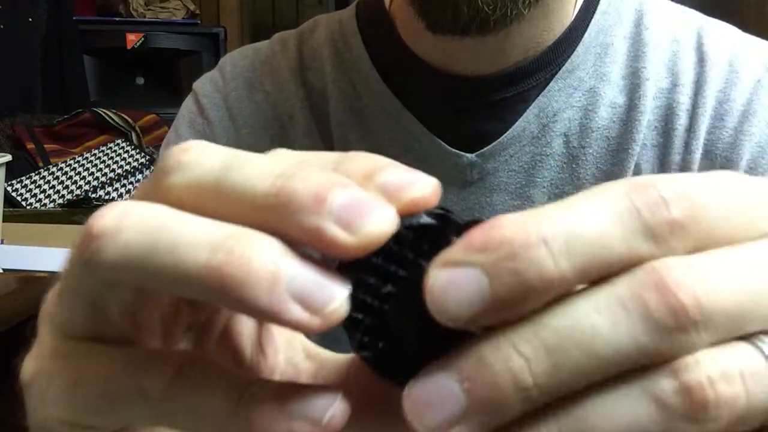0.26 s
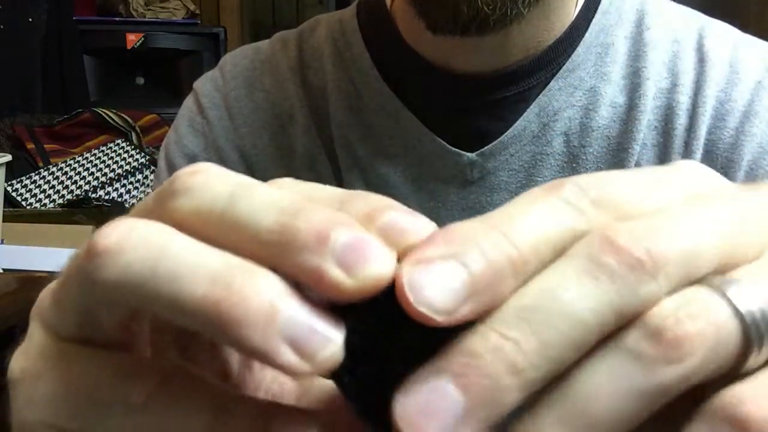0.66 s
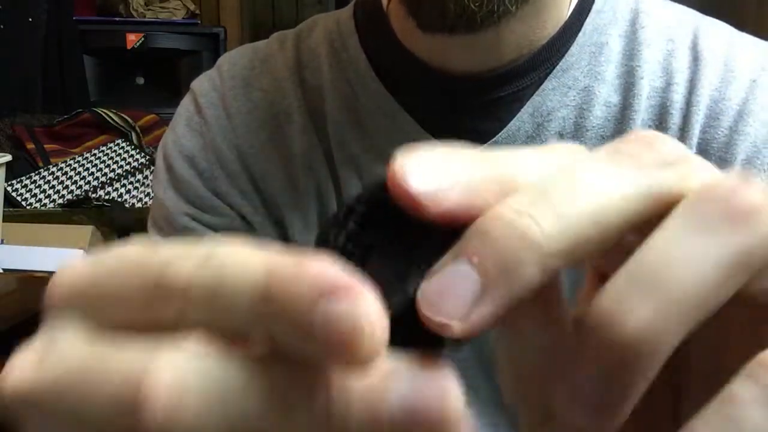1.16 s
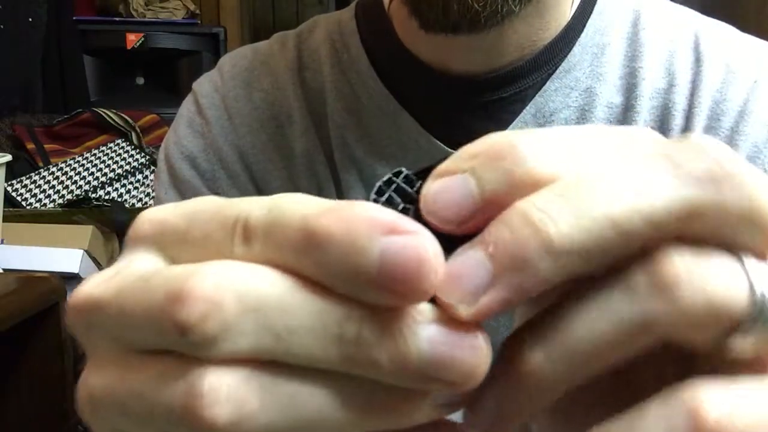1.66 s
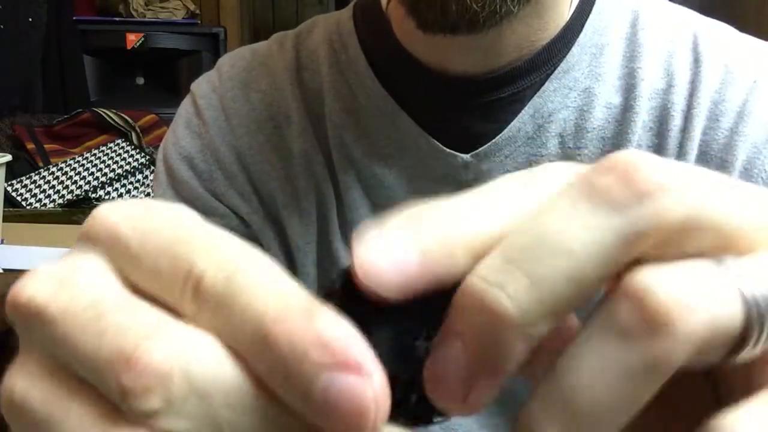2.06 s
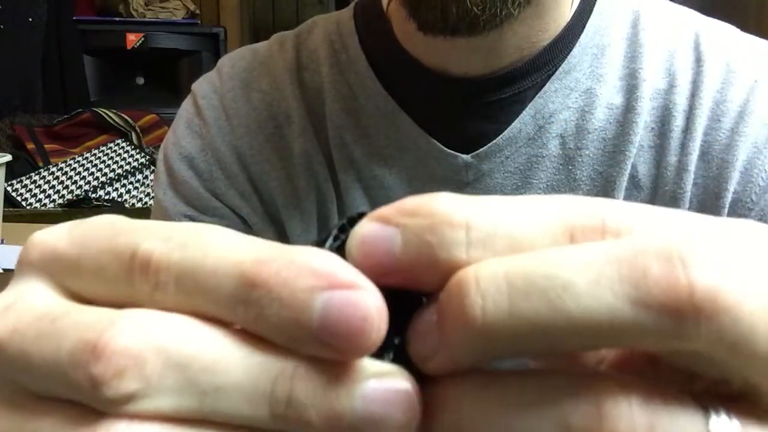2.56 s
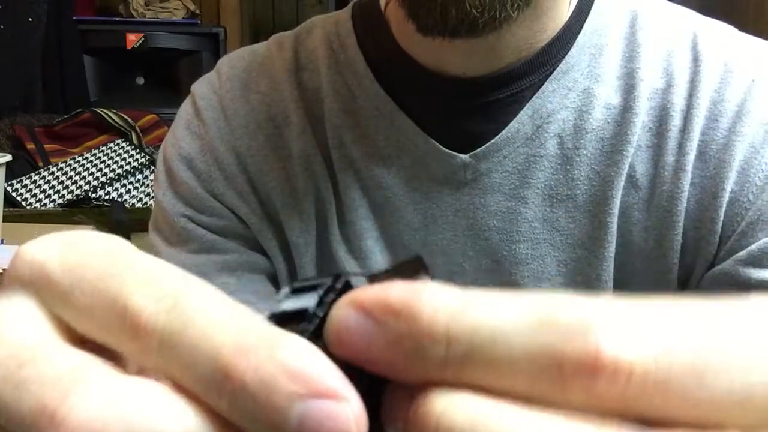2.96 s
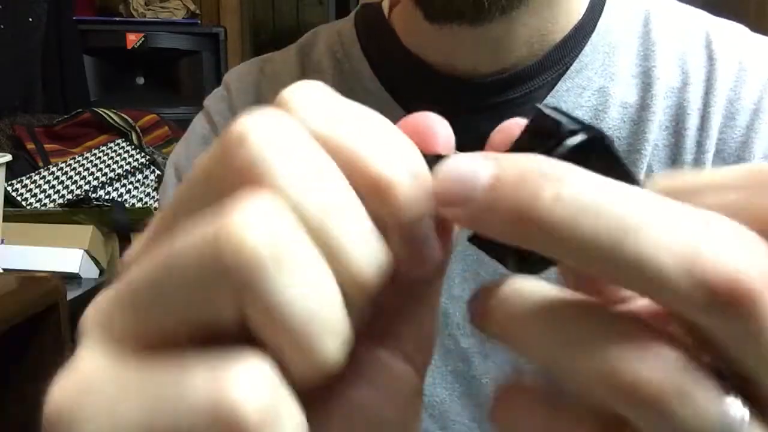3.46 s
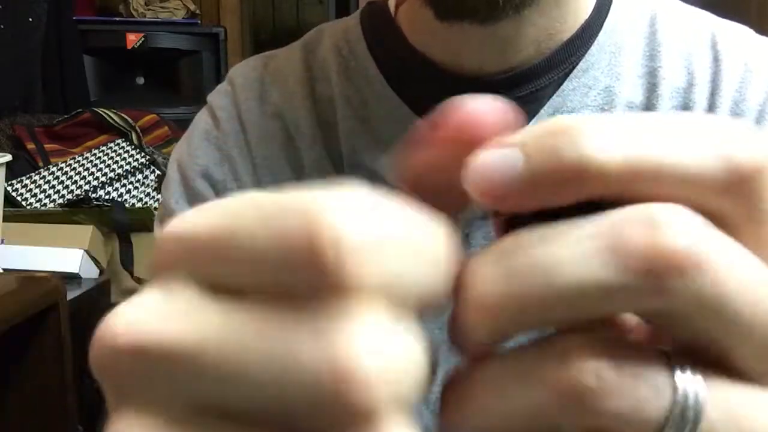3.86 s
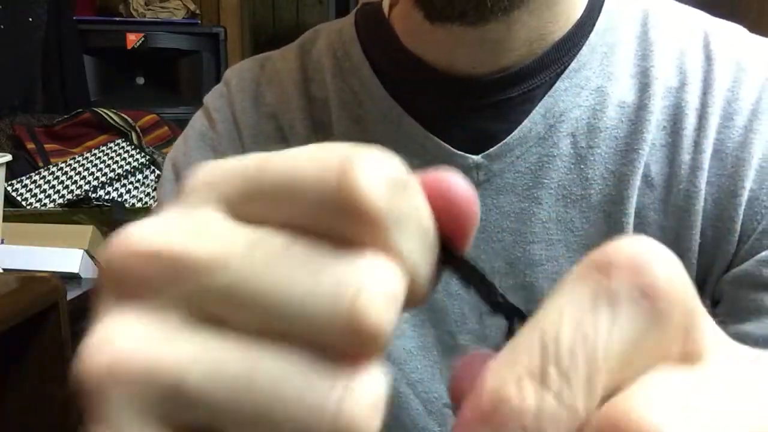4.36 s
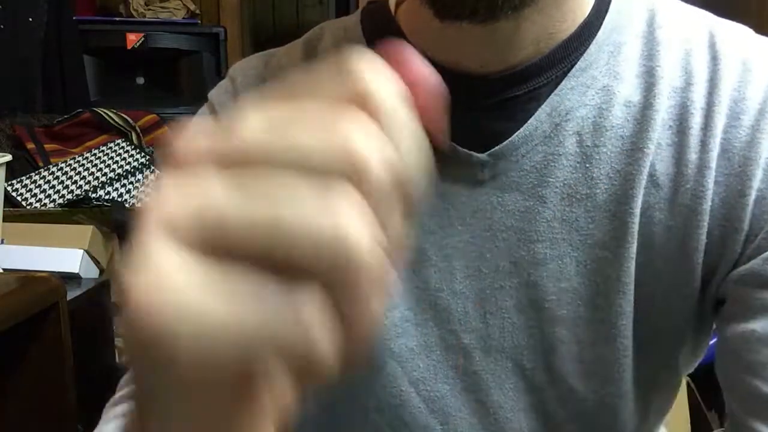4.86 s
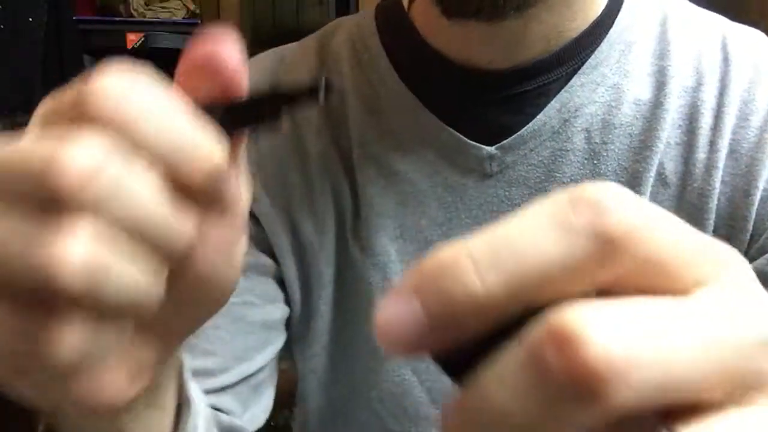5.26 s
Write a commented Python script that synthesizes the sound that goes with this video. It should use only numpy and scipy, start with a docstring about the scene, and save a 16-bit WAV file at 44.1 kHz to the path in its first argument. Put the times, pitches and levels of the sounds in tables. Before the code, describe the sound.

Close, sharp clicks and tiny cracks of thin plastic being broken off by hand in a small, quiet room.

```python
"""Snapping supports off a printed part

Fingers pick brittle plastic struts off a hollow part, close to the microphone in a small room.
Each strut breaks in a burst of tiny fractures that rings the part for a few milliseconds and sheds
crumbs; during each pull thin strands tick and crackle and skin rubs on the ridges. An appliance whines
faintly over the room air; at the very end both stop and a louder low hum takes over."""
import sys
import numpy as np
from scipy import signal
from scipy.fft import rfft, irfft, next_fast_len
from scipy.io import wavfile
from scipy.ndimage import uniform_filter1d

SR = 44100
rng = np.random.default_rng(int(sys.argv[2]) if len(sys.argv) > 2 else 0)


def unload_audio(sound):
    """Save the sound as a 16-bit wav file, at the path given as the first command line argument."""
    columns = np.transpose(np.atleast_2d(sound))
    # keep every value between -1 and 1, then stretch to whole-number steps
    steps = np.round(np.clip(columns, -1, 1) * 32767)
    wavfile.write(sys.argv[1], SR, steps.astype(np.int16))


N = 243873
TIME = np.arange(N) / SR


def amp(db):
    """Convert decibels to an amplitude ratio."""
    return 10 ** (np.asarray(db) / 20)


def set_rms(x, db):
    """Normalise to a root-mean-square level."""
    return x * amp(db) / np.sqrt(np.mean(x ** 2))


def unit_energy(x):
    """Normalise so that the squared samples sum to 1."""
    return x / np.sqrt(np.sum(x ** 2) + 1e-30)


def colour(x, points):
    """Minimum-phase filter through (frequency_hz, gain_db) points, made by folding the cepstrum."""
    size = next_fast_len(2 * len(x), real=True)
    hz, db = np.transpose(points)
    gain = amp(np.interp(np.log(np.fft.rfftfreq(size, 1 / SR) + 1), np.log(hz), db))
    cepstrum = irfft(np.log(gain), size)
    cepstrum[1:size // 2] *= 2
    cepstrum[size // 2 + 1:] = 0
    return irfft(rfft(x, size) * np.exp(rfft(cepstrum)), size)[:len(x)]


def resonate(x, hz, width_hz):
    """Second-order resonance with unit gain at its centre."""
    return signal.lfilter(*signal.iirpeak(min(hz, SR / 2 - 1), hz / width_hz, fs=SR), x)


def add(out, x, start_s):
    """Superpose a short signal on a longer one."""
    start = max(int(start_s * SR), 0)
    out[start:start + len(x)] += x[:max(len(out) - start, 0)]


def drift(rate_hz):
    """Slow random modulation: linearly interpolated noise with an rms of 1."""
    hold = int(SR / rate_hz)
    steps = np.repeat(rng.standard_normal(N // hold + 1), hold)
    return set_rms(uniform_filter1d(steps, hold)[:N], 0)


# Spectrum of the room air: frequency_hz, relative_density_db
AIR_SPECTRUM = [(22, -30.5), (50, -8), (75, 5.5), (105, -3.5), (150, 0.5), (380, -11), (1450, -10.5),
                (1750, -3.5), (2150, -7), (2500, -21.5), (5000, -18.5), (7400, -16.5), (8300, -22.5),
                (13000, -25.5), (16000, -35)]


def room_air(level_db=-69):
    """Stationary broadband noise: the air of the room, strongest in the bass."""
    return set_rms(colour(rng.standard_normal(N), AIR_SPECTRUM), level_db)


# Spectrum of the appliance's hiss: frequency_hz, relative_density_db
HISS_SPECTRUM = [(500, -39), (2600, -11), (3200, 3), (3550, -5), (4000, -3), (4400, -14.5), (4750, -34),
                 (9000, -45)]
# Tones of the appliance: pitch_hz, linewidth_hz, level_db
WHINE_TONES = [(76.8, 15, -77), (604, 83, -80.5), (2220, 24, -81.5), (3312, 14, -71.5), (3590, 50, -84.5),
               (3770, 60, -80), (3850, 16, -69.5), (4030, 25, -75.5), (4128, 15, -84.5), (4400, 20, -87)]


def appliance(hiss_db=-72.5):
    """Line broadening: a random walk in phase widens each tone of the whine, over a wavering hiss."""
    out = set_rms(colour(rng.standard_normal(N), HISS_SPECTRUM), hiss_db) * amp(.7 * drift(3.3))
    for pitch_hz, linewidth_hz, level_db in WHINE_TONES:
        jitter = uniform_filter1d(rng.standard_normal(N), size=200)
        phase_walk = np.cumsum(np.sqrt(2 * np.pi * linewidth_hz / SR) * jitter)
        tone = np.sin(2 * np.pi * pitch_hz * TIME + phase_walk)
        out += set_rms(tone * amp(1.2 * drift(11)), level_db)
    return out


def grip(x, target_db):
    """Spectral shaping: the grip colours a crack, here by filtering four bands towards set energies."""
    bands_hz = [(200, 1000), (1000, 2500), (2500, 9000), (9000, 16000)]  # low, mid, main, top
    centres_hz = [np.sqrt(lo * hi) for lo, hi in bands_hz]
    hz = np.fft.rfftfreq(len(x), 1 / SR)
    for _ in range(3):
        energy = 2 * np.abs(rfft(x)) ** 2 / len(x)
        band_db = [10 * np.log10(energy[(hz >= lo) & (hz < hi)].sum() + 1e-20) for lo, hi in bands_hz]
        x = colour(x, list(zip(centres_hz, np.subtract(target_db, band_db))))
    return x


# Frequency response of the plastic part: frequency_hz, gain_db
PART_RESPONSE = [(200, -24.5), (850, -12), (1150, -11), (2100, -6), (3000, -2), (4100, 1.5), (4900, -4.5),
                 (5800, -1.5), (8200, -1.5), (9500, -1), (10400, -6), (11400, -3), (15500, -6)]


def fracture(noise, strength_db, low_db, mid_db, top_db, part_hz, strut_hz, length_s):
    """Brittle fracture: an impulse and a dying run of duller micro-cracks excite two damped modes."""
    t = np.arange(len(noise)) / SR
    decay_s = max(1.43 * length_s, 1 / SR)
    micro_cracks = colour(noise * np.exp(-t / decay_s), [(7000, 0), (12000, -4)])
    first_break = t == 0
    crack = colour(first_break + amp(1) * unit_energy(micro_cracks), PART_RESPONSE)
    # fingers damp both rings within a few milliseconds; a harder break leaves the strut freer to ring
    part_ring = amp(8) * resonate(crack, part_hz, width_hz=300)
    strut_ring = amp(12 + .29 * strength_db) * resonate(crack, strut_hz, width_hz=520)
    snap = grip(crack + part_ring + strut_ring, (low_db, mid_db, 0, top_db))
    return np.sqrt(SR / 1000) * amp(strength_db + 1) * snap  # energy is referred to one millisecond


# Breaking struts: start_s, strength_db, low_db, mid_db, top_db, part_hz, strut_hz, length_s
# (low, mid and top are relative to the main band of grip)
STRUT_BREAKS = [(.0093, -45.5, -37, -12.5, 0, 2840, 11900, 0.00017),
                (0.1035, -43, -38, -26, 0, 2920, 12000, 0.00037),
                (.1473, -44.5, -41, -28, -6, 1810, 9130, 0.00023),
                (.1668, -30, -39, -19.5, 2.5, 3060, 11600, 0.00017),
                (.1795, -40, -25, -16, 10.5, 2430, 11600, 0.00018),
                (0.2659, -53.5, -35, -26, -2, 2860, 3500, 0.00031),
                (0.2882, -46, -23, -26, -7, 2800, 3520, 0.00032),
                (0.3907, -51, -34, -20, 2, 1360, 12600, .0002),
                (0.4257, -39, -22, -12, -1, 3280, 13220, 0.0074),
                (.4362, -37, -8.5, -8.5, -7.5, 814, 4070, 0.00037),
                (0.5038, -35.5, -34, -46, -15, 3230, 6170, .0004),
                (.5193, -26, -36, -25.5, -11, 3080, 3340, 0.00036),
                (0.5263, -29, -32, -44, -1, 1890, 9300, 0.00015),
                (0.5373, -31.5, -41, -40, -11, 2690, 6150, .0007),
                (0.5547, -29.5, -39, -47, -10, 3280, 7000, .0004),
                (0.5848, -36, -34, -26, -5, 2820, 3450, 0.0011),
                (.6022, -30, -31, -25, 2.5, 3140, 7140, 0.00016),
                (0.6124, -34, -26, -12, 0, 1590, 7540, .0004),
                (.6341, -40, -37, -32, -9, 2950, 6420, 0.00062),
                (0.6546, -23, -35.5, -26.5, 0, 3000, 7860, 0.00033),
                (0.6603, -25.5, -26.5, -11, -0.5, 1760, 3940, 0.00089),
                (0.7216, -35.5, -28, -6, 1, 1950, 11800, 0.00026),
                (.771, -40, -36, -14.5, -0.5, 1680, 5500, .0003),
                (0.8076, -42.5, -31, -16, 6.5, 2170, 12000, 0.00018),
                (0.841, -33, -39, -20, 0, 1240, 4000, 0.00025),
                (0.8629, -34.5, -23.5, -5.5, 2, 1830, 12500, .00024),
                (.87, -28.5, -33, -11, -7, 2230, 5400, 0.00026),
                (0.8843, -48, -27, -8, 10, 1960, 9300, .0002),
                (0.9158, -45.5, -28, -9, -2, 3240, 3720, 0.00044),
                (0.989, -40.5, -48, -10.5, -3, 3280, 3680, 0.00014),
                (1.2441, -43, -32, -24, 1, 2870, 4100, 0.0011),
                (1.2475, -29, -41, -28, -13, 2680, 5000, 0.00022),
                (1.335, -37, -34, -13.5, 0, 2800, 11400, 0.0013),
                (1.3898, -42.5, -28, -19, -8.5, 3070, 6250, .0018),
                (1.463, -41.5, -21, -17, -14, 1760, 4030, .0005),
                (1.4777, -40.5, -26.5, -37, -13.5, 3130, 4640, .0003),
                (1.4901, -36.5, -37, -29, -11, 2170, 4440, 0.00048),
                (1.5221, -21, -29, -25, -1, 3400, 5770, .0004),
                (1.5352, -15.5, -21, -16.5, -12, 1470, 6400, 0.0019),
                (1.536, -14, -21, -24, -6, 3230, 3500, 0.00076),
                (1.5598, -38.5, -25.5, -15, -5, 2990, 3550, 0.00073),
                (1.5661, -35.5, -35, -19, 2, 1730, 6340, .0005),
                (1.6021, -21, -21.5, -12, -5, 2900, 3660, 0.0014),
                (1.6227, -20.5, -34, -29.5, -17.5, 3080, 3770, .00045),
                (1.6287, -28, -28, -17, -3, 3100, 6300, 0.00082),
                (1.6768, -11.5, -19.5, -21, -1.5, 2900, 6240, 0.00058),
                (1.6918, -31, -43, -20, -2.5, 3100, 9300, 0.00058),
                (1.7584, -45, -26, -26, 6.5, 1660, 9700, .0003),
                (1.8968, -38.5, -46, -17, -3.5, 2390, 7750, .0004),
                (1.9065, -40, -31, -12, 0, 2440, 7440, 0.00034),
                (1.9248, -49, -25, -20, 6, 2410, 10800, .0002),
                (1.9572, -29.5, -39, -29, -9.5, 1720, 3850, 0.00018),
                (2.0367, -36, -29, -38, -0.5, 3160, 9900, 0.00015),
                (2.0992, -37.5, -39, -35, -3, 1830, 4200, 0.00033),
                (2.1225, -43, -20, -28, 7.5, 3100, 12770, .0004),
                (2.144, -41, -39.5, -13.5, 0, 2820, 12770, .0003),
                (2.1499, -34, -30, -27, -11.5, 2950, 5960, .0005),
                (2.1746, -30, -20.5, -11.5, -7, 3160, 7100, 0.0025),
                (2.1843, -22.5, -30, -18.5, -5.5, 3080, 4040, 0.00023),
                (2.2027, -37.5, -13.5, -4, -4, 3150, 3650, 0.00089),
                (2.229, -26.5, -35, -19, -5, 3100, 7350, .0006),
                (2.2436, -31, -21, -4.5, -4.5, 3070, 4570, 0.00059),
                (2.2541, -11.5, -46, -27.5, -11.5, 3170, 5500, 0.0004),
                (2.259, -30.5, -18, 1, -12.5, 1880, 4130, .0011),
                (2.3035, -17, -35, -29, -3, 3050, 4370, 0.00047),
                (2.481, -53.5, -27.5, -16.5, -1, 2500, 7900, .0004),
                (2.518, -13, -19.5, -9, -6, 1200, 4520, 0.00054),
                (2.5628, -34.5, -27, -20.5, .5, 3080, 3760, 0.00022),
                (2.7203, -35, -28.5, -24.5, -3.5, 3080, 3730, 0.00065),
                (2.8523, -55.5, 0, 4.5, -19.5, 796, 1910, 0.0014),
                (3.1049, -39, -31, -31, -7.5, 2870, 8790, 0.00085),
                (3.174, -49, -21.5, -22, -1, 1610, 12000, 0.00043),
                (3.3932, -37.5, -38, -23, -7, 3300, 5800, 0.0014),
                (3.4307, -33.5, -56, -22, 2, 2820, 9250, 0.000091),
                (3.4376, -32, -40, -29, -8, 2680, 5340, 0.00072),
                (3.4633, -38.5, -43, -16, 3, 1290, 9000, 0.00028),
                (3.4773, -38, -42, -14, -4, 2680, 5400, 0.0013),
                (3.4908, -32.5, -60, -10, -2, 2380, 9700, 0.00025),
                (3.5575, -28.5, -40, -27.5, -7.5, 2760, 5700, 0.00057),
                (3.69, -36.5, -15.5, -6.5, 0, 850, 12400, 0.0011),
                (3.7053, -13.5, -29.5, -13, -6.5, 2800, 5440, 0.0007),
                (3.7653, -47, -22, -14, -7.5, 2020, 5860, 0.0012),
                (3.8653, -50.5, -33, -15, 2.5, 1850, 11400, .0007),
                (3.9054, -34, -31, -24, -19, 2540, 4900, .0004),
                (3.9322, -40.5, -39, -17, -18, 1900, 3500, 0.00057),
                (4.0377, -34.5, -35, -19.5, -7, 2600, 6030, 0.00034),
                (4.046, -43.5, -30, -18, -15, 2750, 4500, .0006),
                (4.1559, -42.5, -37, -7, -8.5, 2470, 5900, 0.00078),
                (4.1845, -32, -28, -20.5, -0.5, 2480, 8600, 0.0021),
                (4.2147, -43, -17, -5.5, -9.5, 2580, 3450, .0008),
                (4.2398, -42.5, -27, -30, 0.5, 2760, 13160, 0.00054),
                (4.2754, -41, -40, -30, -12, 2820, 3890, 0.0012),
                (4.295, -14.5, -29.5, -16, -10.5, 2800, 8450, 0.00079),
                (4.3297, -17, -16.5, -9, 5.5, 2300, 13000, 0.00013),
                (4.3332, -15, -24.5, -21, -12.5, 2940, 4370, 0.00076),
                (4.3506, -20.5, -52, -9, 3, 2520, 7200, 0.00048),
                (4.3606, -15, -15.5, -9.5, -18, 705, 7300, 0.0011),
                (4.369, -21.5, -18, -17, -5, 1208, 5300, 0.00067),
                (4.3855, -33.5, -28, -10, 8.5, 2930, 9050, .0003),
                (4.39, -25, -32, -17.5, -8.5, 1440, 7800, 0.00079),
                (4.429, -26.5, -18.5, -14, -5.5, 760, 5070, 0.00019),
                (4.5481, -50.5, -16.5, -16, -3.5, 2970, 5560, .0008),
                (4.6465, -34, -37.5, -18.5, -14, 2800, 4800, 0.001),
                (4.768, -49.5, -22.5, -22.5, -.5, 1675, 8570, .0004),
                (4.8028, -36.5, -28, -12, -10, 2480, 4520, 0.0033),
                (4.835, -8, -19.5, -8, -9, 1830, 4270, 0.0011),
                (4.843, -5.5, -22, -20, -6.5, 2680, 4260, 0.00087),
                (4.8457, -12, -18.5, -11, -8.5, 3140, 7400, .0019),
                (5.0049, -40.5, -38.5, -50, -7, 2625, 7430, 0.00073),
                (5.3065, -44.5, -18, 0, 5.5, 1544, 9800, 0.00046)]


def snaps():
    """Release of elastic energy: each strut gives way in one brief fracture."""
    out = np.zeros(N)
    for start_s, *strut in STRUT_BREAKS:
        add(out, fracture(rng.standard_normal(1024), *strut), start_s)
    return out


# Pulls of the fingers at the supports: start_s, length_s, strength_db
FINGER_PULLS = [(0.095, 0.096, -67.5), (0.366, .07, -67.5), (0.511, .17, -58), (0.787, 0.12, -61),
                (1.226, 0.063, -71.5), (1.334, .055, -68.5), (1.449, 0.026, -64), (1.498, 0.02, -51.5),
                (1.534, 0.12, -55), (1.725, 0.1, -72), (1.945, 0.04, -56), (2.035, 0.012, -55.5),
                (2.065, 0.018, -68), (2.119, 0.14, -59.5), (2.308, 0.02, -55.5), (3.083, .025, -67),
                (3.149, 0.038, -65.5), (3.33, .015, -71), (3.386, 0.14, -61), (3.558, 0.026, -52),
                (3.874, 0.044, -57.5), (4.171, 0.083, -62.5), (4.298, 0.08, -47.5), (4.645, .03, -65.5),
                (4.836, .012, -47)]


def crackle_envelope(attack_s=.02, release_s=.016, lead_in_s=.006, settle_s=.014):
    """Incoherent sounds add in power: pulls, a faint swell of noise just before each snap, crumbs after."""
    power = np.zeros(N)
    t = np.arange(SR // 2) / SR
    for start_s, length_s, strength_db in FINGER_PULLS:
        rise = np.minimum(t / attack_s, 1)
        fall = np.exp(-np.maximum(t - attack_s - length_s, 0) / release_s)
        add(power, (amp(strength_db) * rise * fall) ** 2, start_s - attack_s)
    for start_s, strength_db, *_ in STRUT_BREAKS:
        lead_in = amp(strength_db - 28) * t[t < lead_in_s] / lead_in_s
        crumbs = amp(strength_db - 42.5) * np.exp(-t / settle_s)
        add(power, lead_in ** 2, start_s - lead_in_s)
        add(power, crumbs ** 2, start_s)
    return np.sqrt(power)


def crackle(grains_per_s=520, spread_db=6.5):
    """Shot noise and friction: hair-thin strands give way at random while skin rubs the plastic."""
    sizes = amp(spread_db * np.minimum(rng.exponential(size=N), 4)) * rng.choice([-1, 1], N)
    grains = set_rms((rng.random(N) < grains_per_s / SR) * sizes, -2)
    rubbing = set_rms(rng.standard_normal(N), -6)
    through_part = colour(grains + rubbing, PART_RESPONSE)
    brightened = colour(through_part, [(500, -10.5), (2000, 8.5), (5000, 8), (15000, -1.5)])
    return crackle_envelope() * brightened


def ticks(ticks_per_s=75, max_per_pull=24, lowest_hz=3700, highest_hz=11000):
    """Progressive failure: under each pull thin strands break in uneven turn, each at its own pitch."""
    out = np.zeros(N)
    for start_s, length_s, pull_db in FINGER_PULLS:
        gaps, thinness = rng.random((2, max_per_pull))
        offsets_s = (np.cumsum(gaps + .5) - 1) / ticks_per_s
        rings_hz = lowest_hz * (highest_hz / lowest_hz) ** thinness
        draws = rng.standard_normal((max_per_pull, 1024))
        for offset_s, ring_hz, draw in zip(offsets_s[offsets_s < length_s], rings_hz, draws):
            force, brightness, hold = draw[:3]
            part_hz = 2863 * np.exp(.1 * hold)  # the hold of the fingers shifts the part's ring
            tick = fracture(draw[3:], strength_db=pull_db + 6 + 2.5 * force,
                            low_db=-25.5, mid_db=-24, top_db=2.5 + 5.5 * brightness,
                            part_hz=part_hz, strut_hz=ring_hz, length_s=.0014)
            add(out, tick, start_s + offset_s)
    return out


# Slides of a fingertip over the print layers: start_s, length_s, level_db, resonance_hz
FINGER_SLIDES = [(0.42, 0.019, -57, 8500), (1.088, .035, -65, 12460), (3.42, 0.033, -61, 1240),
                 (3.425, 0.023, -51, 2800), (3.467, 0.017, -49, 5460), (3.567, .04, -54.5, 2340),
                 (3.59, 0.013, -46.5, 3900), (3.879, 0.035, -56.5, 5560), (3.924, 0.018, -57, 1870),
                 (3.954, 0.024, -54.5, 5630), (4.198, 0.033, -59, 2560)]


def slides(slips_per_s=420, q=4):
    """Stick-slip friction: skin catches on the ridges, and its random slips drive a broad resonance."""
    out = np.zeros(N)
    t = np.arange(SR // 5) / SR
    for start_s, length_s, level_db, hz in FINGER_SLIDES:
        chance, force = rng.random((2, len(t)))
        slips = (chance < slips_per_s / SR) * (force + .5)
        rubbing = .013 * (force - .5)
        swell = np.sin(np.pi * np.minimum(t / length_s, 1))
        scrape = resonate(resonate((slips + rubbing) * swell, hz, hz / q), hz, hz / q)
        add(out, amp(level_db) * np.sqrt(length_s * SR / 2) * unit_energy(scrape), start_s)
    return out


# Bumps of the flexing part against the fingers: start_s, peak_db, pitch_hz, decay_s
FINGER_BUMPS = [(0.435, -58, 330, .008), (1.538, -48.5, 156, 0.026), (1.566, -50, 150, 0.013),
                (1.677, -57, 120, 0.012), (2.275, -53.5, 145, 0.024), (2.317, -55.5, 138.7, 0.022),
                (4.336, -45, 197, 0.016), (4.837, -33.5, 290, .005), (4.847, -49.5, 131.4, 0.016)]


def bumps():
    """Damped impact: the part meets soft flesh, and a dying push drives a low resonance with Q = 1."""
    out = np.zeros(N)
    t = np.arange(SR // 5) / SR
    for start_s, peak_db, hz, decay_s in FINGER_BUMPS:
        push = rng.standard_normal(len(t)) * np.exp(-t / decay_s)
        thud = resonate(resonate(push, hz, width_hz=hz), hz, width_hz=hz)
        add(out, amp(peak_db) * thud / np.abs(thud).max(), start_s)
    return out


# Spectrum of the noise in the closing hum: frequency_hz, relative_density_db
HUM_SPECTRUM = [(25, -15.5), (55, -10.5), (78, 2.5), (110, -14.5), (170, -17), (260, -28), (900, -31.5),
                (1900, -29.5), (2600, -34.5), (3400, -27.5), (4800, -39.5), (16000, -49)]


def low_hum(pitch_hz=73.7, tone_db=-44, noise_db=-46.5):
    """A tone in noise: a low sinusoid over a rumble that peaks near the same frequency."""
    rumble = set_rms(colour(rng.standard_normal(N), HUM_SPECTRUM), noise_db)
    return rumble + set_rms(np.sin(2 * np.pi * pitch_hz * TIME), tone_db)


def room(x, early_db=-16, tail_db=-19, early_t60_s=.026, tail_t60_s=.14, treble_t60_s=.062):
    """Reverberation: hands, chest and desk reflect first; the room follows, its treble dying soonest."""
    t = np.arange(int(SR * .4)) / SR
    early, tail, treble = (rng.standard_normal(len(t)) * 1000 ** (-t / t60_s)
                           for t60_s in (early_t60_s, tail_t60_s, treble_t60_s))
    early = colour(early * (t > .0015), [(200, -5.5), (3000, 7.5), (8000, 1), (15000, -2)])
    tail = colour(tail, [(150, -1), (1000, -2.5), (4000, -9), (6500, -2.5), (9000, -8), (13000, -13.5)])
    treble = colour(treble, [(5000, -26.5), (10000, -7.5), (16000, 3.5)])
    build_up = np.clip(t / .0027 - .5, 0, 1)
    diffuse = (tail + treble) * build_up
    response = amp(early_db) * unit_energy(early) + amp(tail_db) * unit_energy(diffuse)
    return x + signal.fftconvolve(x, response)[:N]


def scene(air_end_s=5.413, hum_start_s=5.435, fade_s=.002):
    """Superposition: handwork in the room over air and whine, which yield to the hum after a short gap."""
    handwork = room(snaps() + ticks() + crackle() + bumps() + slides())
    background = (room_air() + appliance()) * np.clip((air_end_s - TIME) / fade_s, 0, 1)
    hum = low_hum() * np.clip((TIME - hum_start_s) / fade_s, 0, 1)
    return (handwork + background + hum)[None]


def record(dry, ceiling=.76, cutoff_hz=16200):
    """Soft saturation: the microphone rounds the loudest peaks, then a low-pass filter cuts the top."""
    rounded = ceiling * np.tanh(dry / ceiling)
    low_pass = signal.ellip(8, .2, 70, cutoff_hz, fs=SR, output="sos")
    return signal.sosfilt(low_pass, rounded)


dry = scene()
out = record(dry)
unload_audio(out)
```